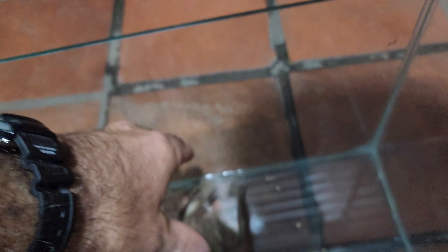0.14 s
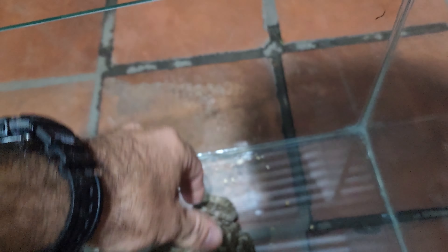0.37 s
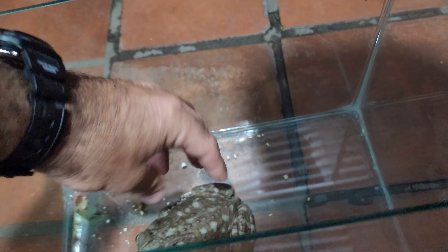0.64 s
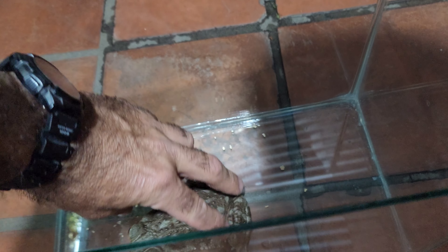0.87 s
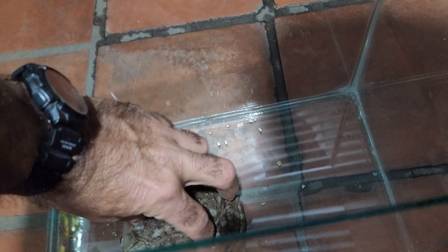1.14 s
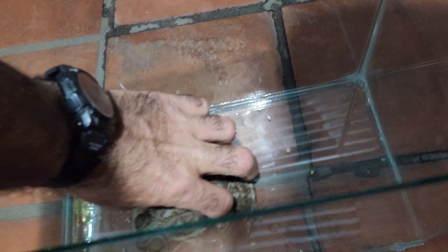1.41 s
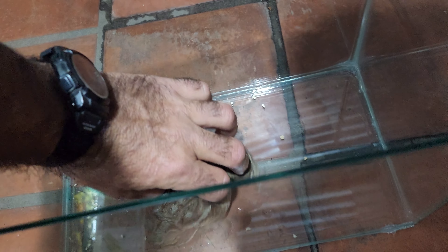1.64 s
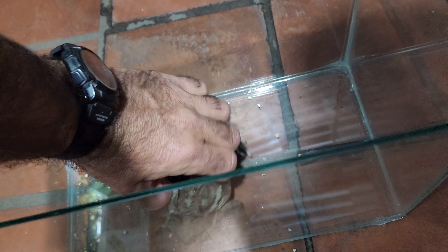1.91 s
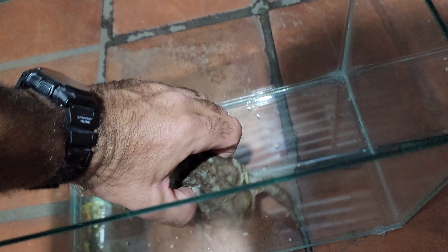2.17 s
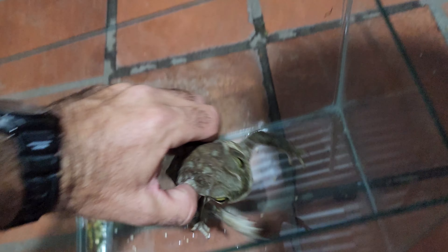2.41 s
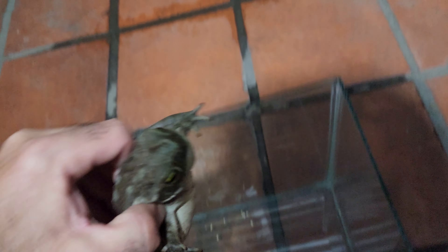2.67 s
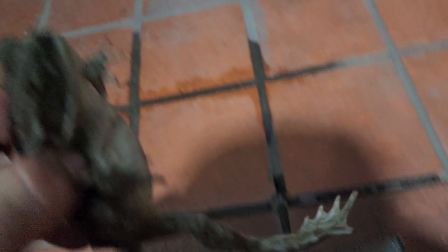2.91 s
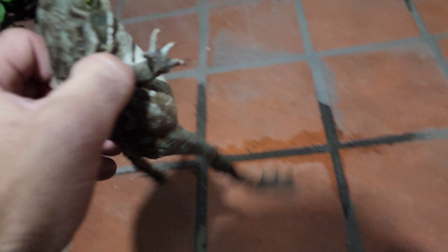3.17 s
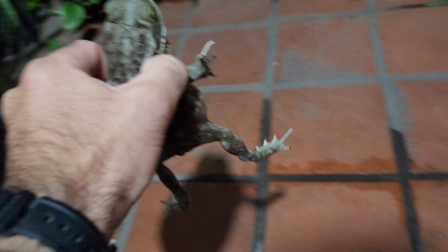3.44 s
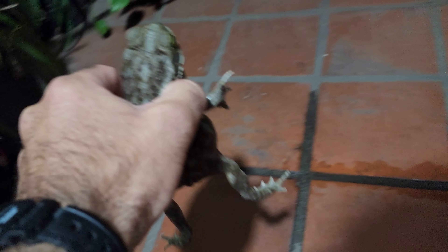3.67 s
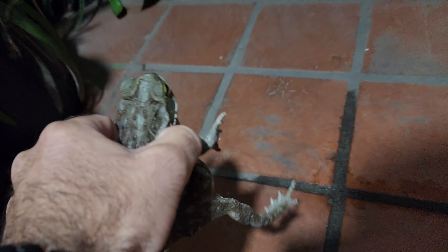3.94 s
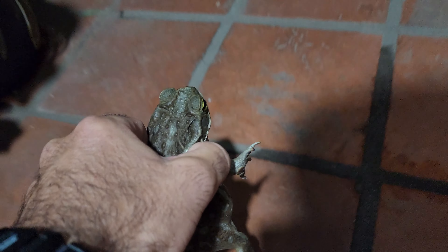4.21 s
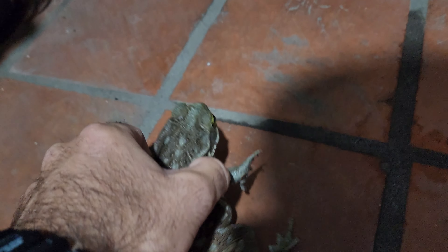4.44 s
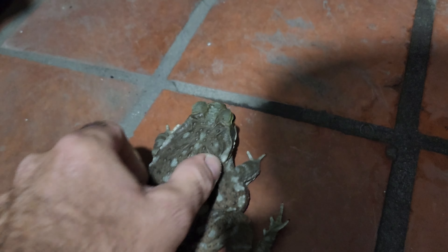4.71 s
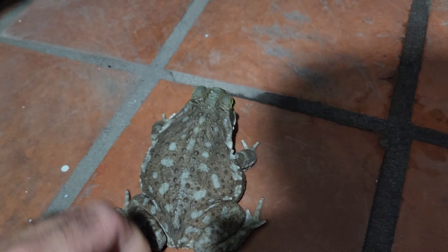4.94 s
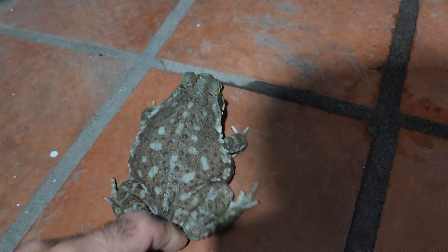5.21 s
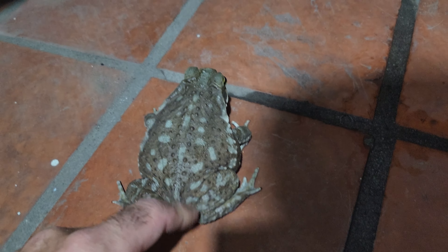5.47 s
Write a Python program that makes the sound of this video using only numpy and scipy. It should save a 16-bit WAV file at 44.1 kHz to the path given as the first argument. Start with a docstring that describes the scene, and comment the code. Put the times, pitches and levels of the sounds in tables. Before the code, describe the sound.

Close stereo pickup in a small, hard tiled space. Right at the start a glass tank is jolted: a faint bump, tiny metallic watch-band clicks, then a strong hollow thud and a second knock with a low hum and rattle. Damp skin squeaks faintly on glass. After a quiet gap, soles tap and scuff while cloth rustles, ending in soft taps. A low rumble continues throughout.

```python
"""A glass tank is jolted on a tile floor, over a low rumble of shaped noise that lasts throughout.
Decaying modes sound the thudding panes, the humming base pane and the clicks of a metal watch band.
Gliding narrow noise gives the squeak of damp skin on glass. Someone shifts about: pulses and noise bursts
make the tapping soles, gated noise the scuffs and rustling cloth; a faint low tone sounds briefly.
A two-port microphone hears it in a hard, small space, whose echo is decaying noise."""
import sys
import numpy as np
from scipy import signal
from scipy.fft import rfft, irfft, next_fast_len
from scipy.io import wavfile
from scipy.ndimage import uniform_filter1d

SR = 44100
rng = np.random.default_rng(int(sys.argv[2]) if len(sys.argv) > 2 else 0)


def nominal_scale(level):
    """Amplitude ratio for a level in decibels (scalar or array-like)."""
    x = np.asarray(level, float) / 20
    return 10 ** x


def transcribe(u):
    """Save the signal u as a 16-bit wav file named by the first command-line argument.

    u: samples, shape (n,) or (channels, n), limited to [-1, 1]; the rate is SR.
    q: integer samples, one column per channel.
    """
    v = np.clip(np.atleast_2d(u).T, -1, 1)
    q = np.round(v * 32767).astype(np.int16)
    wavfile.write(sys.argv[1], SR, q)


N = 246504
T = np.arange(N) / SR  # time/s

# correlation of the ambience and body noise at the two ports: f/Hz, left-right correlation
PORT_CORRELATION = [(60, 1), (130, 0.99), (290, 0.88), (640, 0.51), (1410, -0.26), (3100, 0.065),
                    (6820, 0.013), (15000, -0.2)]

# level of the low rumble, raised around the 3.46 s footfall: t/s, level/dB
RUMBLE_LEVEL = [(0, -49), (.4, -55), (1.0, -55), (2.3, -58), (2.9, -57), (3.44, -43), (3.83, -53.5),
                (4.2, -44), (5.2, -51.5), (5.59, -50.5)]
# spectra of the deep rumble and of the drone: f/Hz, relative level/dB
DEEP_SPECTRUM = [(18, -29.5), (35, 33.5), (60, 39), (110, 17.5), (160, -44.0)]
DRONE_SPECTRUM = [(90, -44), (140, 4.5), (210, 17.5), (260, -20.0), (340, -45.5)]
# spectrum of the dull wash: f/Hz, relative level/dB
WASH_SPECTRUM = [(20, 0.5), (65, 3.5), (143, -0.5), (245, -9), (330, -15.5), (570, -20.5), (750, -26.5),
                 (2000, -34.5), (3000, -39), (4300, -41.5), (5300, -48), (6600, -46.5), (7800, -56.5),
                 (9000, -93.5)]
# stereo balance of the wash and hiss bands: f/Hz, left minus right level/dB
AMBIENCE_BALANCE = [(60, 0.5), (110, -1.5), (200, -1), (380, 0.5), (700, 5.5), (1290, -0.5), (2380, -6),
                    (4400, -12.5), (8120, 10.5), (15000, 9)]
# faint wavering hiss bands: f/Hz, width/Hz, mean level/dB
HISS_BANDS = [(1413, 220, -69.5), (2120, 260, -74.5), (3720, 480, -69), (4530, 230, -79.5),
              (5930, 670, -80)]
DRONE_DB = -3  # drone relative to the deep rumble
WASH_DB = -42  # mean level

# gestures of the body, each held at its level before flicker and panning:
# t/s, length/s, scuff level/dB, cloth level/dB, low drag level/dB
GESTURES = [(0.212, .1, -66.5, -85.5, -54.5), (0.355, 0.036, -61, -72, -69),
            (.57, 0.035, -68.5, -99, -74.5), (0.963, 0.15, -60.5, -69.5, -67),
            (1.78, 0.044, -70, -104, -65), (2.383, 0.052, -55.5, -54.5, -72),
            (2.462, 0.025, -61.5, -54, -53.5), (2.94, 0.059, -61.5, -62.5, -67),
            (3.052, 0.069, -47.5, -47, -71), (3.283, .04, -62, -66, -58), (3.347, .17, -47, -52.5, -46.5),
            (3.636, 0.12, -56.5, -61.5, -72), (3.724, 0.046, -50, -53.5, -54),
            (3.934, 0.018, -51, -56, -63), (3.983, .055, -56, -68.5, -53.5), (4.194, 0.19, -67.5, -96, -67),
            (4.292, 0.33, -63, -78, -72), (5.336, 0.016, -66, -86.5, -80)]
# spectrum of soles scuffing: f/Hz, relative level/dB
SCUFF_SPECTRUM = [(1200, -35.5), (2000, 0), (2600, -5.5), (3600, -1.5), (4400, -1), (5200, -6),
                  (6500, -3.5), (7800, -11), (10000, -56)]
# spectrum of cloth rustling: f/Hz, relative level/dB
CLOTH_SPECTRUM = [(4500, -30), (7500, -4), (9600, -8), (11800, 0), (14000, -2), (16000, -3)]
# spectrum of weight dragging: f/Hz, relative level/dB
DRAG_SPECTRUM = [(150, -31.0), (350, 11.5), (700, 9.0), (1800, 4), (2600, -68.5)]
BRISK_DB = -50  # scuff level of a brisk gesture
BRISK_RISE_DB_PER_S, BRISK_FALL_DB_PER_S = 221.5, 192  # scuff edges of a brisk gesture
HALF_SPEED_DB = 16  # edges are half as steep for each such drop in scuff level
CLOTH_STEEPER, DRAG_STEEPER = 1.59, 1  # edge slopes as multiples of the scuff's
SCUFF_REST_DB, CLOTH_REST_DB, DRAG_REST_DB = -74.5, -103, -62.5  # the body is never quite still
BODY_PAN_DB = -3.5  # left minus right
CLOTH_LEFT_DB = 9.5  # added to that balance: the cloth is further to the left than the soles

# modes of the tank panes: f/Hz, relative level/dB, t60/s
PANE_MODES = [(109, -8, 2.92), (278, -18.5, 0.41), (318.2, -7.5, 0.23), (350, 3.5, 0.044),
              (350, -8.5, 0.25), (400, -15.5, 0.23), (441, -28, 0.11), (552, -16, 0.17), (627, -8, 0.13),
              (874, -21, 0.12), (980, -31, 0.13), (1034, -20, 0.082), (1163, -16, 0.13), (1280, -13, 0.054),
              (1368, -10.5, 0.062), (1560, -28, 0.09), (2150, -28, 0.17), (2330, -36.5, 0.097)]
# blows on the tank: t/s, level/dB, reference f/Hz, fall/(dB per octave) away from it (negative: rise),
# rattle level/dB
BLOWS = [(0.0174, -22.5, 640, 22.5, -55), (.036, -41, 400, -5, -58.5), (0.2129, -2, 347, 1, -31.5),
         (.281, -6.5, 1210, 15, -37)]
# stereo balance of the panes: f/Hz, left minus right level/dB
PANE_BALANCE = [(60, 1.5), (110, 1.5), (200, 0.5), (380, 0.0), (700, -3.0), (1290, -2.5), (2380, -2.5),
                (4400, -6.5), (8120, 0.0), (15000, 3.0)]
PUSH_S = 0.0047  # a soft blow keeps pushing for a few ms: time constant up to 700 Hz
BOX_AIR_HZ, BOX_AIR_WIDTH_HZ = 350, 140
PANES_DIRECT_DB = -9  # panes heard directly, against panes through the box air
TANK_LAG_S = 0.00025  # right port later: the tank is nearer the left port

# damp skin slipping on glass: t/s, length/s, level/dB, starting centre f/Hz, glide/(Hz per s)
SKIN_SLIPS = [(0.022, 0.015, -58, 4340, -18000), (0.352, 0.008, -49.5, 3840, 3001),
              (0.383, .055, -58, 4050, 2998)]
SLIP_ROUGHNESS = 0.3  # roughness rate as a share of the starting centre
SLIP_RISE_DB_PER_S, SLIP_FALL_DB_PER_S = 1102, 904

# modes of the watch-band links: f/Hz, relative level/dB, t60/s
LINK_MODES = [(2372, -7.5, 0.044), (2850, -15, 0.0099), (3700, -12.5, .015), (4460, 10, 0.011),
              (5040, 3.5, 0.049), (5300, -7, .015), (6120, -11.5, 0.013), (6760, 2.5, 0.021),
              (6900, -19.5, 0.025), (9150, -22, .012), (11600, -32, 0.022), (15100, -34.5, .01)]
# clicks of the links: t/s, level/dB, brightness/(dB per octave) about 4500 Hz, left minus right level/dB
LINK_CLICKS = [(0.134, -61.5, -2, 5.5), (.1453, -53.5, 1, -24), (0.1453, -39, -8, -4.5),
               (0.1471, -55.5, 6.5, 4), (0.1486, -46, 15.5, 4), (0.151, -52.5, -4.5, -11.5),
               (0.1555, -53, -13.5, -7), (.2145, -52.5, 10, 0), (1.259, -76, -12, -3.5)]

# soles meeting tile: t/s, tap level/dB, contact pulse width (standard deviation)/ms,
# grit level/dB, thud level/dB
FOOTFALLS = [(2.4773, -13, 0.069, -33.5, -32), (3.052, -49, 0.078, -46, -72), (3.252, -38, 0.071, -61, -61),
             (3.2654, -27, 0.1, -41.5, -40), (3.279, -37, 0.11, -59, -52), (3.464, -14, 0.82, -49.5, -34.5),
             (3.912, -43, 0.05, -54.5, -63), (5.319, -33, 1.2, -65, -72), (5.412, -33, 0.67, -83, -59)]
STEP_PAN_DB = -3.5  # left minus right, for tap and grit
BOOM_DB = -0.5  # low boom of the tank or room answering the step, against the thud

# one faint low tone: t/s, length/s, level/dB, mean f/Hz
LOW_TONE = (2.5, 0.14, -58, 485)
LOW_TONE_EDGE_DB_PER_S = 400

ROOM_T60_S, ROOM_TREBLE_T60_S, ROOM_SPLIT_HZ = 0.35, 0.29, 3300
# diffuse tail against the sound that feeds it
PANES_ROOM_DB, THUD_ROOM_DB, CLICK_ROOM_DB, STEP_ROOM_DB = -7, -12.5, -4, -8.5
MIC_LOW_HZ = 25.8


def read(table, hz):
    """Interpolation on a logarithmic frequency axis, with table levels in dB or as plain values."""
    f, v = np.transpose(table)
    return np.interp(np.log(np.maximum(hz, 1)), np.log(f), v)


def unit(x):
    """Normalisation to a root-mean-square of 1."""
    return x / np.sqrt(np.mean(x ** 2))


def pan(db):
    """Level-difference stereo: left and right gains for a left-minus-right difference."""
    return nominal_scale(np.array([db, -db]) / 2)


def hiss(gain_db, balance_db=lambda hz: 0 * hz):
    """Spectral shaping: coloured noise at two ports, partly correlated, with the bass alike at both."""
    size = next_fast_len(N)
    hz = np.fft.rfftfreq(size, 1 / SR)
    alike = np.clip(read(PORT_CORRELATION, hz), -0.99, 0.99)
    mid, side = rfft(rng.standard_normal((2, size))) * nominal_scale(gain_db(hz))
    opposed = np.array([[1], [-1]]) * side
    ports = mid * np.sqrt(1 + alike) + opposed * np.sqrt(1 - alike)
    return unit(irfft(ports * pan(balance_db(hz)), size)[:, :N])


def walk(rate):
    """Random modulation: levels held 1 / rate s, then smoothed by two moving averages."""
    hold = int(SR / rate)
    levels = np.repeat(rng.standard_normal(N // hold + 1), hold)
    return uniform_filter1d(uniform_filter1d(levels, hold), hold)[:N]


def gesture_db(start, length, db, rise, fall):
    """Exponential growth and decay: in dB a straight rise, a hold and a straight fall."""
    return db - rise * np.maximum(start - T, 0) - fall * np.maximum(T - start - length, 0)


def add(out, s, x):
    """Superposition: mixes x into out from time s."""
    i = int(s * SR)
    n = min(x.shape[-1], N - i)
    out[:, i:i + n] += x[..., :n]


def ring(hz, t60, length):
    """Free vibration: one exponentially damped mode."""
    t = T[:int(length * SR)]
    return np.sin(2 * np.pi * hz * t) * np.exp(-np.log(1000) * t / t60)


def burst(t60, lo_hz, hi_hz):
    """Damped random excitation: a band of crackling noise, unrelated at the two ports."""
    t = T[:int(SR / 4)]
    uneven = nominal_scale(1.0 * rng.standard_normal((2, len(t))))
    noise = rng.standard_normal((2, len(t))) * uneven
    band = signal.butter(3, [lo_hz, hi_hz], "band", fs=SR, output="sos")
    return unit(signal.sosfilt(band, noise)) * np.exp(-np.log(1000) * t / t60)


def highpass(order, hz, x):
    """Butterworth attenuation of what lies below hz."""
    return signal.sosfilt(signal.butter(order, hz, "high", fs=SR, output="sos"), x)


def room(x, db):
    """Diffuse reverberation: convolution with decaying noise whose treble dies first."""
    t = T[:int(SR / 2)]
    noise = rng.standard_normal((2, len(t)))
    low = signal.sosfilt(signal.butter(1, ROOM_SPLIT_HZ, fs=SR, output="sos"), noise)
    tail = low * nominal_scale(-60 * t / ROOM_T60_S) + (noise - low) * nominal_scale(-60 * t / ROOM_TREBLE_T60_S)
    tail = tail * (1 - np.exp(-t / 0.004))  # first reflections need a few ms
    tail = tail / np.sqrt(np.sum(tail ** 2, axis=1, keepdims=True))
    source = x.mean(axis=0, keepdims=True)
    return x + nominal_scale(db) * signal.fftconvolve(source, tail)[:, :N]


def ambience():
    """Filtered random noise: low rumble and drone of varying level, a dull wash, narrow hiss bands."""
    s, level_db = np.transpose(RUMBLE_LEVEL)
    deep = hiss(lambda hz: read(DEEP_SPECTRUM, hz))
    drone = hiss(lambda hz: read(DRONE_SPECTRUM, hz))

    def balance(hz):
        return read(AMBIENCE_BALANCE, hz)

    wash = hiss(lambda hz: read(WASH_SPECTRUM, hz), balance)
    out = nominal_scale(np.interp(T, s, level_db)) * (deep + nominal_scale(DRONE_DB) * drone)
    out = out + nominal_scale(WASH_DB + 0.24 * walk(3.41)) * wash
    for centre_hz, width_hz, band_db in HISS_BANDS:
        band = hiss(lambda hz: -20 * np.log10(1 + ((hz - centre_hz) / width_hz * 2) ** 2), balance)
        out = out + nominal_scale(band_db + 2.5 * walk(5.4)) * band
    return out


def movement():
    """Friction noise: soles scuff, cloth rustles higher up, weight drags lower down, in flickering slips."""
    power = nominal_scale(np.array([[SCUFF_REST_DB], [CLOTH_REST_DB], [DRAG_REST_DB]])) ** 2
    steeper = np.array([[1], [CLOTH_STEEPER], [DRAG_STEEPER]])
    for start, length, *levels_db in GESTURES:
        speed = steeper * 2 ** ((levels_db[0] - BRISK_DB) / HALF_SPEED_DB)
        rise, fall = speed * BRISK_RISE_DB_PER_S, speed * BRISK_FALL_DB_PER_S
        level_db = gesture_db(start, length, np.array(levels_db)[:, None], rise, fall)
        power = power + nominal_scale(level_db) ** 2
    scuff_gain, cloth_gain, drag_gain = np.sqrt(power)
    slips = nominal_scale(1.0 * walk(67) + 1.1 * walk(340))
    grains = 1 + 1.2 * np.maximum(walk(1500) - 1.3, 0)  # only the peaks stand out
    scuff = hiss(lambda hz: read(SCUFF_SPECTRUM, hz)) * scuff_gain * nominal_scale(0.9 * walk(25.3))
    cloth = hiss(lambda hz: read(CLOTH_SPECTRUM, hz)) * cloth_gain * nominal_scale(2.1 * walk(28))
    cloth = cloth * pan(CLOTH_LEFT_DB)[:, None]
    drag = hiss(lambda hz: read(DRAG_SPECTRUM, hz)) * drag_gain
    return slips * pan(BODY_PAN_DB)[:, None] * (grains * (scuff + cloth) + drag)


def tank():
    """Modal superposition and resonance: blows ring the panes; the box air takes a few cycles to swell."""
    panes, rattle = np.zeros((2, N)), np.zeros((2, N))
    for s, db, reference_hz, fall_db, rattle_db in BLOWS:
        for hz, mode_db, t60 in PANE_MODES:
            mode = ring(hz, t60, t60)
            rise = 1 - np.exp(-T[:len(mode)] / PUSH_S * max(hz / 700, 1) ** 2)
            gain = nominal_scale(db + mode_db - fall_db * abs(np.log2(hz / reference_hz)))
            add(panes, s, gain * pan(read(PANE_BALANCE, hz))[:, None] * mode * rise)
        chatter = burst(0.11, 1100, 4500) + nominal_scale(-17.5) * burst(0.017, 3300, 6400)
        add(rattle, s - 0.002, nominal_scale(rattle_db) * pan(-3.3)[:, None] * chatter)
    air = signal.lfilter(*signal.iirpeak(BOX_AIR_HZ, BOX_AIR_HZ / BOX_AIR_WIDTH_HZ, SR), panes)
    out = air + nominal_scale(PANES_DIRECT_DB) * panes + rattle
    out[1] = np.interp(T - TANK_LAG_S, T, out[1])
    # this close, the upper modes have the larger diffuse share; the thud's scattered tail roughens its ring
    thud = signal.sosfilt(signal.butter(2, [200, 750], "band", fs=SR, output="sos"), out)
    upper = highpass(4, 750, out)
    return out - upper - thud + room(upper, PANES_ROOM_DB) + room(thud, THUD_ROOM_DB)


def skin_slip():
    """Rough friction squeak: slow complex noise modulates a gliding carrier."""
    out = np.zeros((2, N))
    for start, length, db, hz, glide in SKIN_SLIPS:
        centre = hz + glide * np.clip(T - start, 0, length)
        carrier = np.exp(2j * np.pi * np.cumsum(centre) / SR)
        rate = hz * SLIP_ROUGHNESS
        rough = np.array([walk(rate) + 1j * walk(rate) for _ in range(2)])
        level_db = gesture_db(start, length, db, SLIP_RISE_DB_PER_S, SLIP_FALL_DB_PER_S)
        out = out + nominal_scale(level_db) * unit(np.real(rough * carrier))
    return out


def watch_band():
    """Impact excitation: each click shakes the links' modes a little differently and crackles into the room."""
    links, crackle = np.zeros((2, N)), np.zeros((2, N))
    chance = rng.standard_normal((len(LINK_CLICKS), len(LINK_MODES)))
    for (s, db, bright_db, pan_db), row in zip(LINK_CLICKS, chance):
        click = 0
        for (hz, mode_db, t60), c in zip(LINK_MODES, row):
            gain_db = mode_db + 2.0 * c + bright_db * np.log2(hz / 4500)
            click = click + nominal_scale(gain_db) * ring(hz, t60, 0.05)
        add(links, s, nominal_scale(db) * pan(pan_db)[:, None] * click)
        add(crackle, s, nominal_scale(db + 6.0) * pan(pan_db)[:, None] * burst(0.038, 2400, 6900))
    links = highpass(4, 2000, links)  # links this small radiate no bass
    return links + room(crackle, CLICK_ROOM_DB)


def steps():
    """Contact impact: a sole on tile gives a pressure pulse set by contact time, then grit and a dull thud."""
    out = np.zeros((2, N))
    side = pan(STEP_PAN_DB)[:, None]
    for s, tap_db, contact_ms, grit_db, thud_db in FOOTFALLS:
        width = contact_ms / 1000
        u = T[:int(16 * width * SR) + 1] / width - 8  # time from the pulse centre, in widths
        pulse = np.exp(-u ** 2 / 2) - np.exp(-u ** 2 / 12.5) / 2.5  # no net pressure
        thud = nominal_scale(thud_db) * (burst(0.32, 230, 375) + nominal_scale(1.5) * burst(0.076, 475, 885))
        boom = nominal_scale(thud_db + BOOM_DB) * burst(0.46, 83, 198)  # the tank or room answers the step
        grit = nominal_scale(grit_db) * burst(0.27, 740, 4870)
        add(out, s - 8 * width, nominal_scale(tap_db) * side * pulse)
        add(out, s, side * grit + (thud + boom).mean(axis=0))
    upper = highpass(2, 500, out)
    return out - upper + room(upper, STEP_ROOM_DB)


def moan():
    """Frequency modulation: a short low tone wavers slightly in pitch."""
    start, length, db, hz = LOW_TONE
    tone = np.sin(2 * np.pi * np.cumsum(hz * (1 + 0.012 * walk(29.9))) / SR)
    return nominal_scale(gesture_db(start, length, db, LOW_TONE_EDGE_DB_PER_S, LOW_TONE_EDGE_DB_PER_S)) * tone


def scene():
    """Linear superposition of all sources at the two ports."""
    return ambience() + movement() + tank() + skin_slip() + watch_band() + steps() + moan()


def low_pass(x):
    """Removes everything above the highest recorded frequency."""
    return signal.sosfilt(signal.butter(12, 15800, fs=SR, output="sos"), x)


def record(dry):
    """High-pass response of the microphone: the deepest bass is dropped."""
    mix = highpass(2, MIC_LOW_HZ, dry)
    return low_pass(mix)


dry = scene()
out = record(dry)
transcribe(out)
```